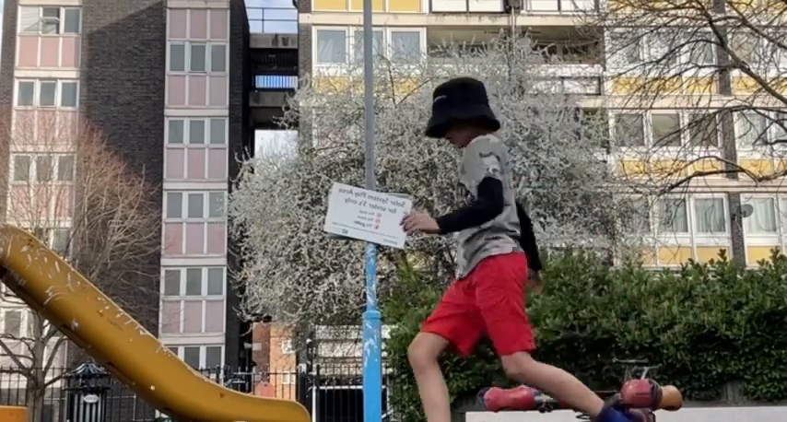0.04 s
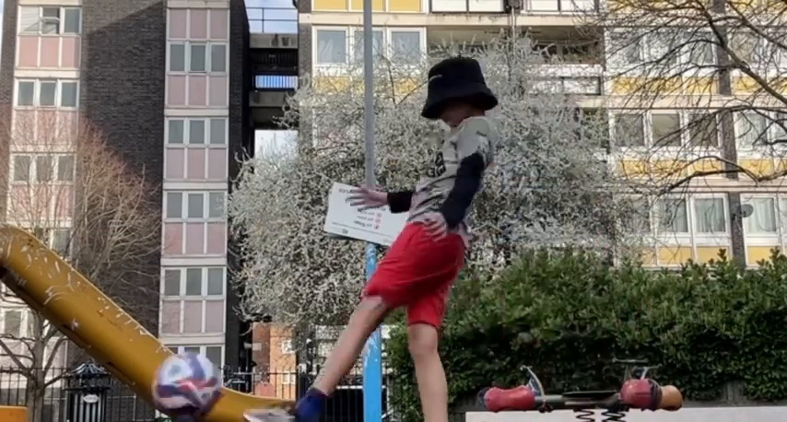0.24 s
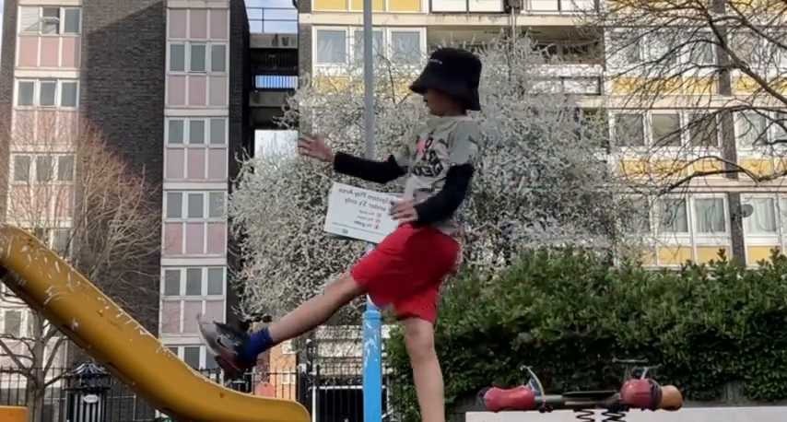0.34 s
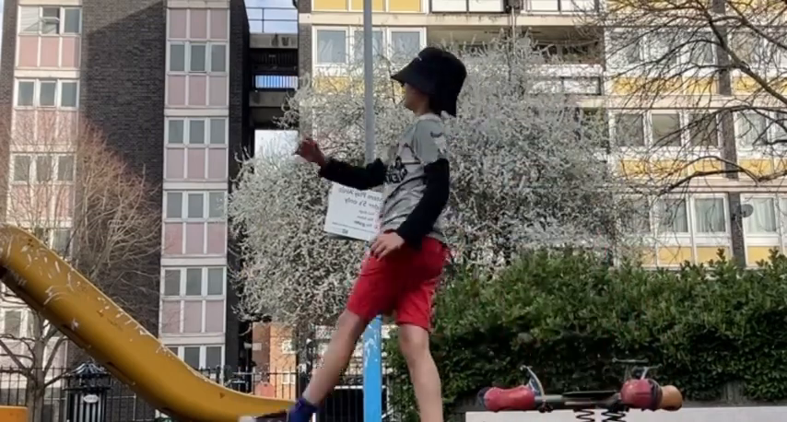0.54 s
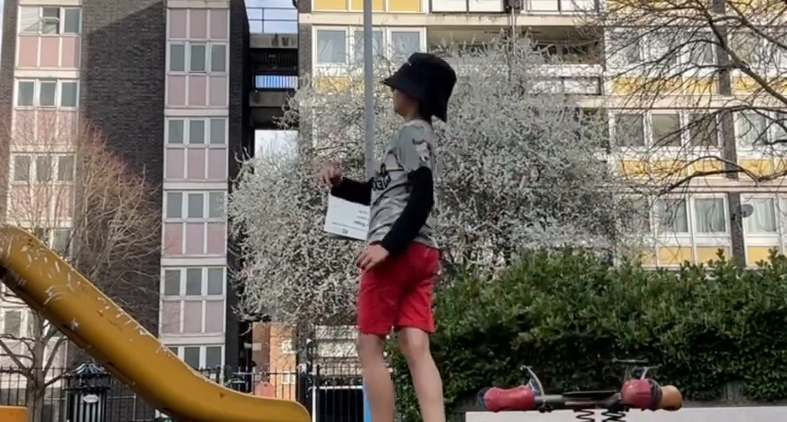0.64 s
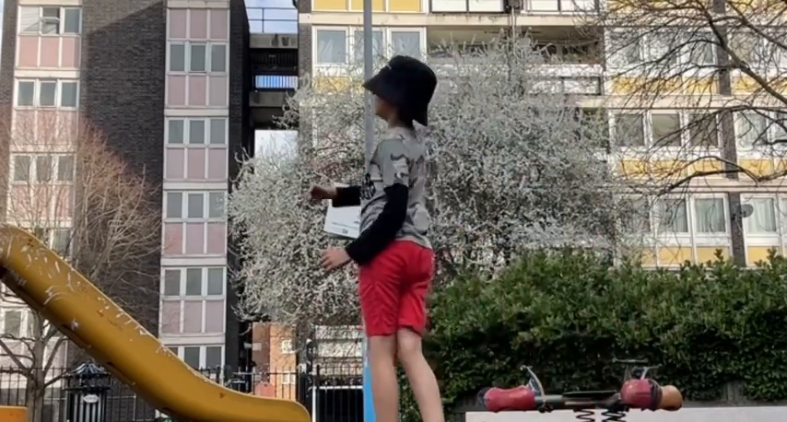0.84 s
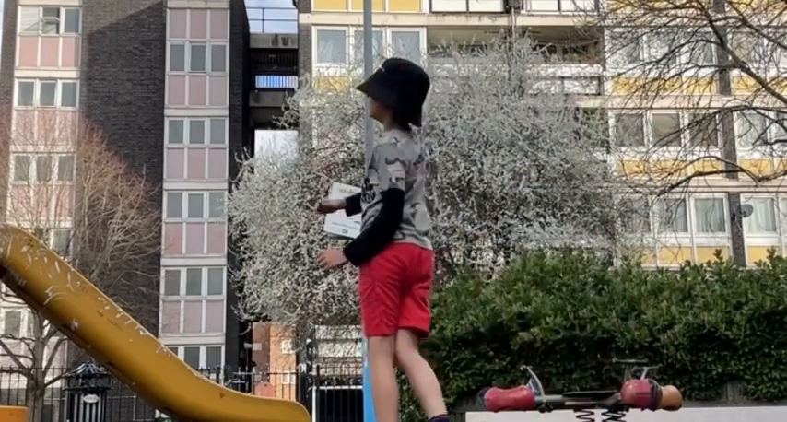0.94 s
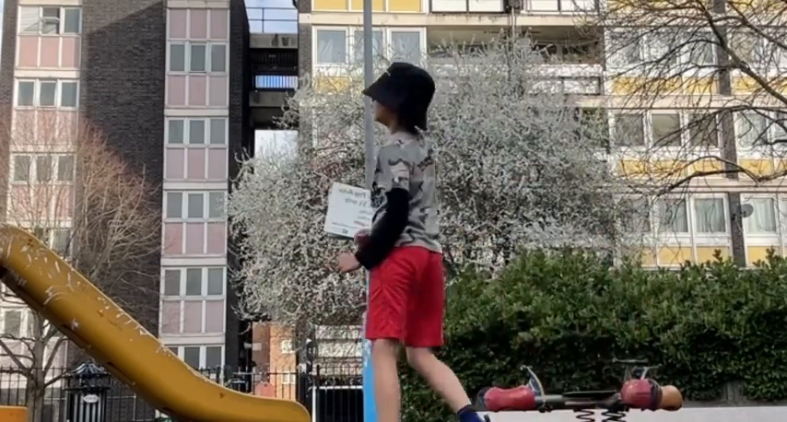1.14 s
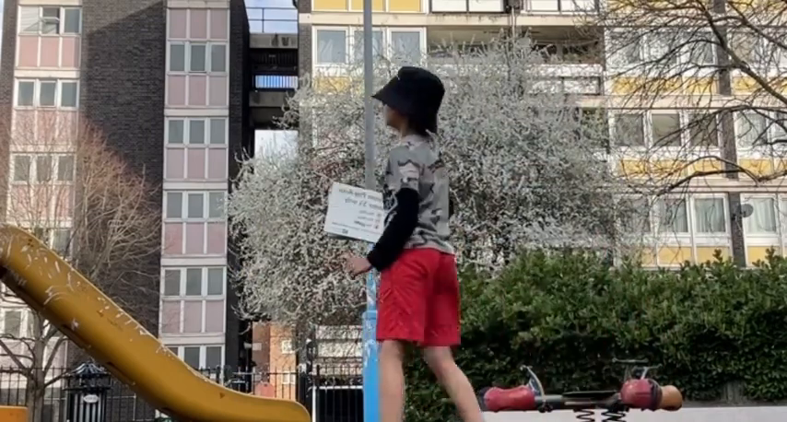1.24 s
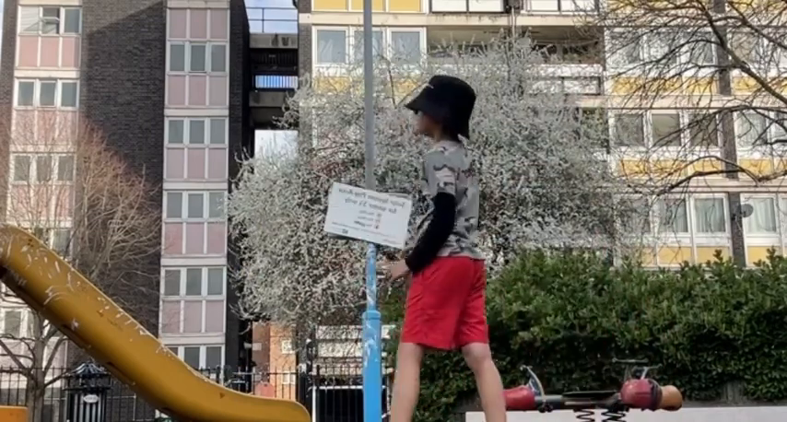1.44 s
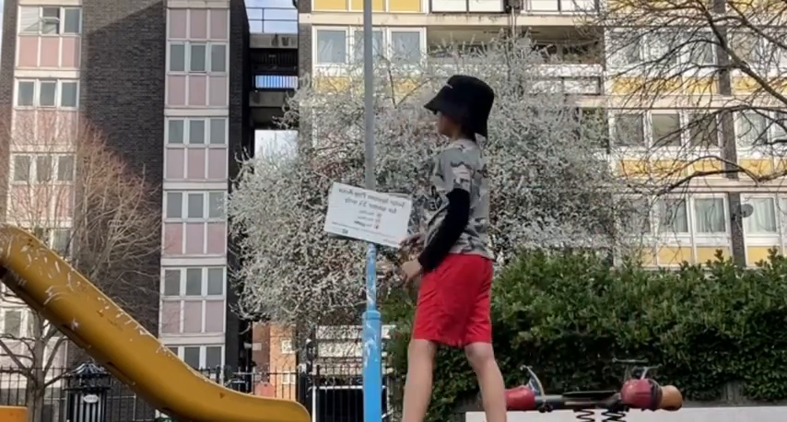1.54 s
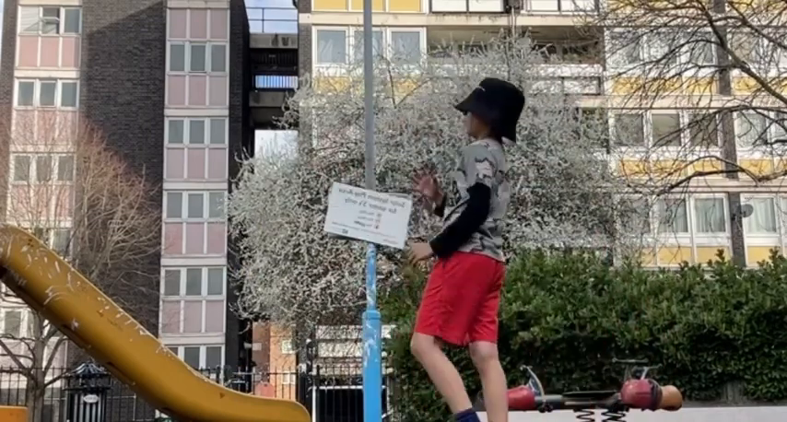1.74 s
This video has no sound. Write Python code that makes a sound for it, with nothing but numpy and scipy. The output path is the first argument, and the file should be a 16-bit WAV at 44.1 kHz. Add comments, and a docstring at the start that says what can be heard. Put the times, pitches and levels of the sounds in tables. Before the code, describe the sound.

Close stereo pickup outdoors: low steps, a scuff and a sharp, boomy ball kick with short echoes off buildings, then light scuffing, tiny ticks and a distant ball bouncing with fading knocks over quiet traffic.

```python
"""A playground between tower blocks, in stereo made from a middle and a side signal. A shoe scrapes the ground and
kicks a football: filtered noise for grit and slap, short swelling tones for the ball. The blocks answer with late
copies and the yard with fading noise. Low thuds and short pushes come before and after the kick, and the ball
knocks further off to one side as noise bursts with a hollow note. Traffic rumbles, leaves rustle and something
small ticks in the hedge, all three made of shaped noise."""
import sys
import numpy as np
from scipy import signal
from scipy.fft import rfft, irfft, next_fast_len
from scipy.io import wavfile
from scipy.ndimage import map_coordinates

SR = 44100
rng = np.random.default_rng(int(sys.argv[2]) if len(sys.argv) > 2 else 0)


def field_ratio(decibels):
    """Amplitude ratio for a level in dB (20 dB per decade); scalars and array-likes work."""
    return 10 ** (np.asarray(decibels, dtype=float) / 20)


def store_wav(level_fs):
    """Save 16-bit WAV to argv[1]."""
    pcm = np.round(np.clip(np.atleast_2d(level_fs), -1, 1) * 32767)
    wavfile.write(sys.argv[1], SR, pcm.T.astype(np.int16))


N = 79380
T = np.arange(N) / SR  # time of each sample, in seconds

# How far the side runs ahead of the middle, for near sounds: (frequency [Hz], phase lead [rad])
NEAR_LEAD = [(600, -.8), (1000, -1.1), (1400, -1.5), (2100, -3.1), (4500, -3.1), (5200, -2.4)]
# The same for traffic and leaves: (frequency [Hz], phase lead [rad])
AIR_LEAD = [(1000, 2.06)]
# Relative side spectrum of the shoe, also used in the kick's rattle: (frequency [Hz], level [dB])
SHOE_SIDE = [(200, -50), (500, -24), (1040, -4.5), (2400, -7.5), (3100, -4), (5200, -20.5), (15000, -38),
             (16300, -70)]
# Relative middle spectrum of a ball knock, also used in the kick's rattle: (frequency [Hz], level [dB])
KNOCK_MID = [(120, 0.5), (350, 2), (770, -3), (1240, -5), (2100, -12.5), (4500, -21), (6500, -35),
             (8000, -52.5), (16000, -65)]

SLAP_TILT_DB, BRIGHT_HZ = 1.5, 5000  # a slap gains this many dB an octave, up to this frequency


def unit(x):
    """Scales a sound to an rms (average strength) of 1."""
    return x / np.sqrt(np.mean(x ** 2) + 1e-20)


def along(points, hz):
    """Reads a curve of (Hz, value) points on a log frequency axis."""
    f, v = np.transpose(points)
    return np.interp(np.log(hz + 1), np.log(f + 1), v)


def curve(rows):
    """Joins (s, value) rows by straight lines."""
    return np.interp(T, *np.transpose(rows))


def wobble(rate):
    """A smooth random curve through rate random points a second."""
    points = rng.standard_normal(N // 8)
    return map_coordinates(points, [T * rate])


def swell(s, length, skew=0.94):
    """A rounded rise and fall of peak 1 from s on; a skew under 1 peaks early."""
    roundness = 1.69
    progress = np.clip((T - s) / length, 0, 1)
    return np.sin(np.pi * progress ** skew).clip(0) ** roundness


def dying(s, t60, rise):
    """A quick rise from s on, with a fall of 60 dB in t60 seconds."""
    t = (T - s).clip(0)
    return (1 - np.exp(-t / rise)) * field_ratio(-60 * t / t60)


def tilted(points):
    """Brightens a spectrum for a slap: it gains the same dB with each octave, up to BRIGHT_HZ."""
    return [(hz, db + SLAP_TILT_DB * np.log2(min(hz, BRIGHT_HZ))) for hz, db in points]


def hiss(mid, side, side_db, lead, alike):
    """Stereo noise of rms 1 from two spectra; the share alike of the side is the middle's noise, phase shifted."""
    m = next_fast_len(N + 8192)
    hz = np.fft.rfftfreq(m, 1 / SR)
    mid_noise, own_noise = rfft(rng.standard_normal((2, m)))
    alike = np.clip(alike, 0, 1)
    shifted = mid_noise * np.exp(1j * along(lead, hz))
    side_noise = alike * shifted + np.sqrt(1 - alike ** 2) * own_noise
    mid_shaped = mid_noise * field_ratio(along(mid, hz))
    side_shaped = side_noise * field_ratio(along(side, hz) + side_db)
    centre, across = irfft([mid_shaped, side_shaped], m)[:, :N]
    return unit(np.array([centre + across, centre - across]))


def traffic():
    """Unsteady traffic: mostly low noise whose level drifts."""
    # Loudness over time: (time [s], level [dB])
    traffic_level = [(0, -46), (.04, -42.5), (.17, -45.5), (.33, -37), (.55, -42), (1.8, -44)]
    # Relative middle and side spectra: (frequency [Hz], level [dB])
    traffic_mid = [(25, -36), (45, -3), (65, 3), (100, 1), (200, -6), (500, -15), (1000, -19), (2000, -36),
                   (6000, -100)]
    traffic_side = [(30, -27.5), (100, -15.5), (700, -19.5), (1000, -17), (1500, -31.5), (6000, -100)]
    level_db = curve(traffic_level) + 0.94 * wobble(11.91)
    return field_ratio(level_db) * hiss(traffic_mid, traffic_side, 0.1, AIR_LEAD, 0.3)


def leaves():
    """Rustling leaves: higher noise that comes and goes."""
    # Loudness over time: (time [s], level [dB])
    rustle_level = [(0, -59), (.3, -54), (.75, -57.5), (1.03, -55.5), (1.15, -51.5), (1.36, -58.5),
                    (1.45, -55.5), (1.55, -58.5), (1.8, -56)]
    # Relative middle and side spectra: (frequency [Hz], level [dB])
    leaf_mid = [(500, -68), (1500, -2), (3200, -7), (5000, -11), (6500, -16.5), (7200, -30.5), (10000, -42),
                (16300, -63)]
    leaf_side = [(500, -53), (1500, 4.5), (3000, -0.5), (7000, -10), (10000, -17.5), (13400, -16),
                 (15600, -13), (16100, -81)]
    level_db = curve(rustle_level) + 0.12 * wobble(21.0)
    return field_ratio(level_db) * hiss(leaf_mid, leaf_side, 0.14, AIR_LEAD, 0.63)


def yard(x):
    """The open yard's answer comes late, has little bass, and each frequency dies at its own speed."""
    late_s, bass_hz, level_db = 0.036, 248, -27.5  # little returns below bass_hz
    # Fading time: (frequency [Hz], time to fall by 60 dB [s])
    yard_fade = [(70, 0.47), (400, 0.95), (8000, 0.17)]
    hz, t, z = signal.stft(rng.standard_normal((2, SR)), SR, nperseg=1024)
    fade = field_ratio(-60 * t / along(yard_fade, hz)[:, None])
    less_bass = (hz / (hz + bass_hz))[:, None] ** 2
    tail = signal.istft(z * fade * less_bass, SR, nperseg=1024)[1]
    tail = tail / np.linalg.norm(tail[0])
    mid, side = signal.fftconvolve([x[0] + x[1], x[0] - x[1]], tail, axes=1)[:, :N] / 2
    answer = np.array([mid + side, mid - side])
    return field_ratio(level_db) * np.pad(answer, ((0, 0), (round(late_s * SR), 0)))[:, :N]


def ticks():
    """Thin high ticks: short dying bursts of noise in a narrow band."""
    # The ticks: (time [s], level [dB])
    tick_times = [(0.931, -41.5), (0.945, -39.5), (1.697, -48), (1.733, -47)]
    # Relative spectrum, for middle and side alike: (frequency [Hz], level [dB])
    tick_spectrum = [(2400, -63), (3100, 1.5), (5200, -19), (8000, -96)]
    bursts = sum(field_ratio(db) * dying(s, 0.029, 0.00031) for s, db in tick_times)
    return bursts * hiss(tick_spectrum, tick_spectrum, 3.7, NEAR_LEAD, 0.95)


def thuds():
    """Thuds: swelling tones with dull noise in them, mostly low, some the body of a scrape or ball knock."""
    # The pushes: (start [s], length [s], frequency [Hz], level of the tone's swell [dB])
    push_rows = [(0.037, 0.039, 77, -31.5), (0.071, 0.019, 124.3, -26.5), (.328, .055, 70.6, -33),
                 (0.42, 0.055, 66.5, -32), (0.527, 0.014, 158.3, -29.5), (0.499, .12, 81.72, -31.5),
                 (0.678, 0.049, 316.4, -38.5), (0.703, 0.0069, 572, -26), (0.953, 0.056, 69.4, -38.5),
                 (1.0543, 0.0086, 330, -25.5), (1.361, 0.015, 250, -33), (1.413, 0.018, 237, -37.5),
                 (1.629, 0.028, 79, -37.5), (1.701, 0.044, 124.3, -31)]
    # Relative spectrum of the dull noise: (frequency [Hz], level [dB])
    clump_spectrum = [(40, -13), (100, 2.5), (300, -6), (700, -25.5), (3000, -82)]
    clump = field_ratio(-6.5) * hiss(clump_spectrum, clump_spectrum, -8, NEAR_LEAD, 0.76)
    pushes = 0
    for s, length, hz, db in push_rows:
        tone = np.sin(2 * np.pi * hz * (T - s))
        pushes = pushes + field_ratio(db) * swell(s, length) * (tone + clump)
    return pushes


def knocks():
    """The ball knocks far off: a bright slap, then a hollow note inside a burst that rattles out."""
    # The knocks: (start [s], slap level [dB], body level [dB], hollow note level at left [dB], time to fall 60 dB [s])
    knock_rows = [(1.05, -24.5, -23, -17.5, 0.078), (1.111, -31.5, -31, -47, 0.078),
                  (1.404, -37.5, -33.5, -40.5, 0.069), (1.589, -37, -33.5, -36, 0.054)]
    # Relative side spectrum: (frequency [Hz], level [dB])
    knock_side = [(150, -27), (600, -3.5), (1200, -1), (2300, -9.5), (4500, -17.5), (6000, -30.5),
                  (15500, -43), (16000, -102)]
    # How far the side runs ahead of the middle: (frequency [Hz], phase lead [rad])
    far_lead = [(400, 1.3), (1000, 0.75), (2000, 1.9), (4000, 2.06)]
    body_late_s = 0.0052  # the hollow body answers after the slap
    note_hz, note_s, note_right_db, note_lag_rad = 1271.6, 0.01, -14.5, 1.8  # right is weaker and lags

    slaps = sum(field_ratio(db) * dying(s, t60, 0.00028) for s, db, _, _, t60 in knock_rows)
    bodies = sum(field_ratio(db) * dying(s + body_late_s, t60, 0.00037) for s, _, db, _, t60 in knock_rows)
    note_swells = sum(field_ratio(db) * swell(s + body_late_s, note_s, 0.51) for s, _, _, db, _ in knock_rows)

    unsteady_hz = note_hz * (1 + 0.03 * wobble(250))
    phase = 2 * np.pi * np.cumsum(unsteady_hz) / SR
    note = np.array([np.sin(phase), field_ratio(note_right_db) * np.sin(phase - note_lag_rad)])
    bright = hiss(tilted(KNOCK_MID), tilted(knock_side), 4.3, far_lead, 0.96)
    hollow = hiss(KNOCK_MID, knock_side, 1.5, far_lead, 0.55)
    return slaps * bright + bodies * hollow + note_swells * note


def scrapes():
    """Grit under the sole: uneven noise under each stroke, with bright fizz in the hard ones."""
    # The strokes: (start [s], length [s], level before the unevenness [dB])
    stroke_rows = [(0.194, 0.033, -27.5), (0.67, 0.029, -40), (.692, 0.021, -34.5), (0.72, 0.021, -39),
                   (0.419, 0.041, -44.5)]
    # Relative middle spectra of grit and fizz: (frequency [Hz], level [dB])
    shoe_mid = [(250, -18), (520, 6.5), (750, -1.5), (1000, -29.5), (1620, -3.5), (1940, -28.5), (2230, -3),
                (2600, -43), (3130, -7), (5050, -34), (6500, -37), (10000, -87)]
    fizz_mid = [(600, -32.5), (3200, -11), (5000, -12.5), (6500, -23.5), (8500, -60), (15000, -40),
                (16300, -78)]
    strokes = sum(field_ratio(db) * swell(s, length, 1) ** 0.5 for s, length, db in stroke_rows)
    # the fizz grows twice as fast as a stroke's dB
    hard = sum(field_ratio(24 + 2 * db) * swell(s, length) ** 0.5 for s, length, db in stroke_rows)
    uneven = field_ratio(1.5 * wobble(710))
    grit = uneven * strokes * hiss(shoe_mid, SHOE_SIDE, -5.4, NEAR_LEAD, 0.86)
    fizz = hard * hiss(fizz_mid, SHOE_SIDE, -0.45, NEAR_LEAD, 0.9)
    return grit + fizz


def kick():
    """A short bright slap and its rattle, then lower resonances swell in turn; the blocks return the knock."""
    # Ball and ground swell and fade, before a slight lean to the left:
    # (frequency before the sag [Hz], start after the slap [s], length [s], peak [dB], skew [1])
    boom_rows = [(388.3, 0.0011, 0.0076, -1.5, 0.72), (181.5, 0.0029, 0.024, -11, 0.32),
                 (83.3, 0.0041, 0.06, -5, 0.72), (356.5, 0.00835, 0.033, -26, 0.65)]
    # Returns of the first swell from the blocks: (delay [s], level against that swell [dB])
    echo_rows = [(.074, -27.5), (.105, -23.5)]
    # Air ringing in the ball: (frequency [Hz], level at the right [dB])
    ring_rows = [(1620, -15.5), (2230, -14), (3130, -11.5), (3750, -16.5), (5050, -20.5)]
    # Relative middle and side spectra of the slap: (frequency [Hz], level [dB])
    slap_mid = [(350, -33.5), (800, 6), (3130, -12.5), (5050, -7.5), (6500, -52), (10000, -45), (15000, -9),
                (16500, -73)]
    slap_side = [(350, -42), (600, 3), (3150, -3), (5400, -13.5), (6400, -18), (10500, -23), (15000, -4.5),
                 (16500, -85)]
    kick_s, slap_db = 0.2285, -16
    rattle_late_s, rattle_t60_s, rattle_db = 0.0075, 0.12, -14  # dB against the slap
    sag_per_s = 2.5  # the notes sag as the ball recovers
    ring_left = -0.34  # left share of the ring, upside down

    # the slap of leather
    slap_shape = field_ratio(slap_db) * swell(kick_s, 0.0035, 0.48) ** 0.5
    slap = slap_shape * hiss(slap_mid, slap_side, 4.2, NEAR_LEAD, 0.41)

    # its scattered return from things nearby
    rattle_shape = field_ratio(slap_db + rattle_db) * dying(kick_s + rattle_late_s, rattle_t60_s, 0.0036)
    side_lift_db = SLAP_TILT_DB * np.log2(BRIGHT_HZ)  # lifts the side to match the tilted middle
    rattle = rattle_shape * hiss(tilted(KNOCK_MID), SHOE_SIDE, side_lift_db, NEAR_LEAD, 0.78)

    tones = sum(field_ratio(db) * np.sin(2 * np.pi * (hz * T + rng.random())) for hz, db in ring_rows)
    ring = swell(kick_s, 0.006, 0.41) * tones * np.array([[ring_left], [1]])

    since_kick = T - kick_s
    booms = []
    for hz, late, length, db, skew in boom_rows:
        cycles = hz * (since_kick - late) * (1 - sag_per_s * since_kick / 2)
        booms.append(field_ratio(db) * swell(kick_s + late, length, skew) * np.sin(2 * np.pi * cycles))
    echoes = sum(field_ratio(db) * np.roll(booms[0], round(late * SR)) for late, db in echo_rows)
    low = (sum(booms) + echoes) * field_ratio([[0.3], [-0.3]])  # left slightly louder
    return slap + ring + rattle + low


def scene():
    """Kick, scrapes and knocks are answered by the yard; the rest is added as it is."""
    struck = kick() + scrapes() + knocks()
    background = traffic() + leaves()
    return struck + yard(struck) + thuds() + ticks() + background


def low_pass(x):
    """Removes everything above the highest recorded frequency."""
    return signal.sosfilt(signal.butter(12, 16480, fs=SR, output="sos"), x)


def record(dry):
    """Soft clipping: loud peaks are rounded off so that they stay below a top level."""
    top = 0.93
    finished = dry / (1 + np.abs(dry / top) ** 10) ** (1 / 10)
    return low_pass(finished)


dry = scene()
out = record(dry)
store_wav(out)
```